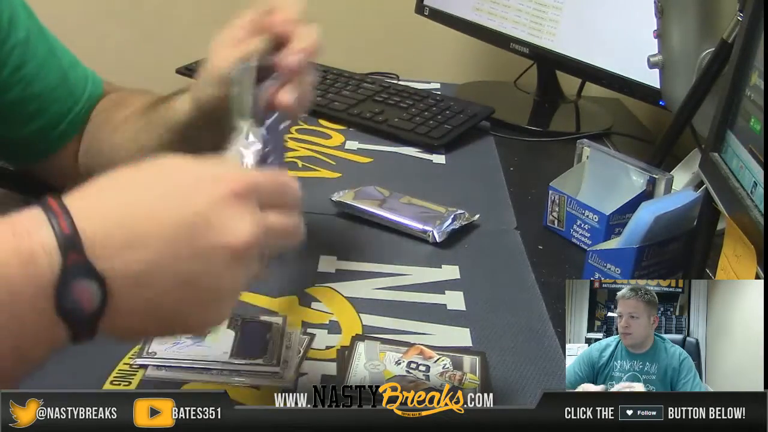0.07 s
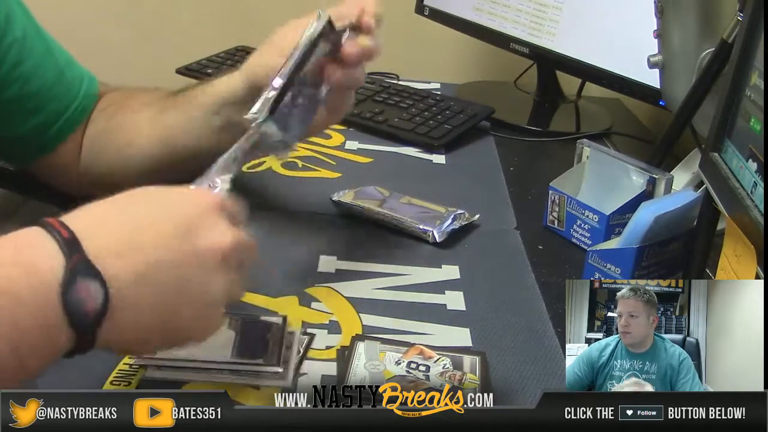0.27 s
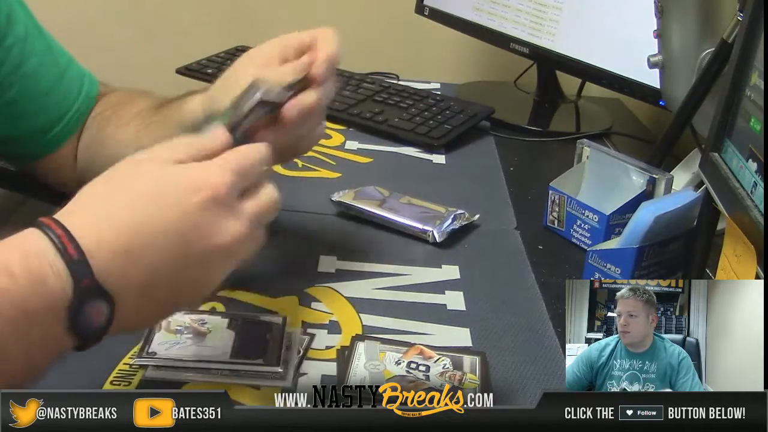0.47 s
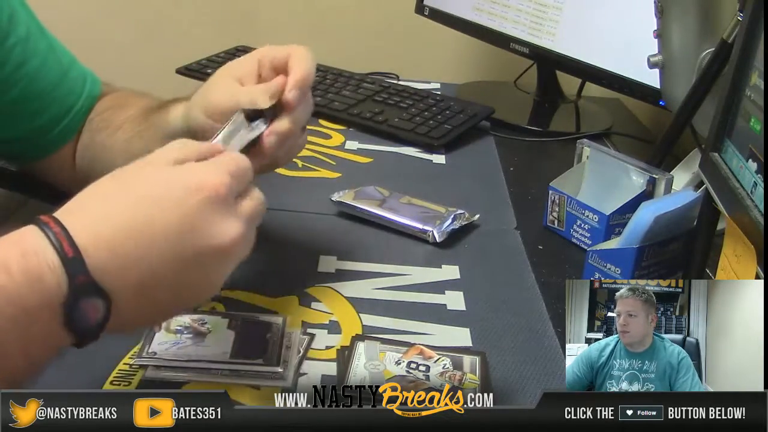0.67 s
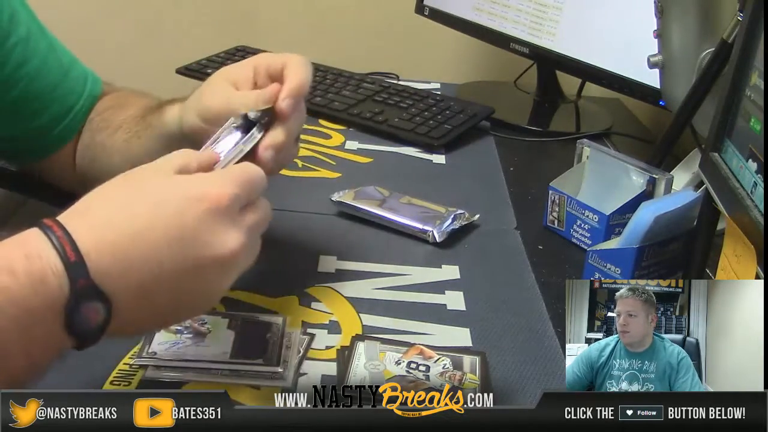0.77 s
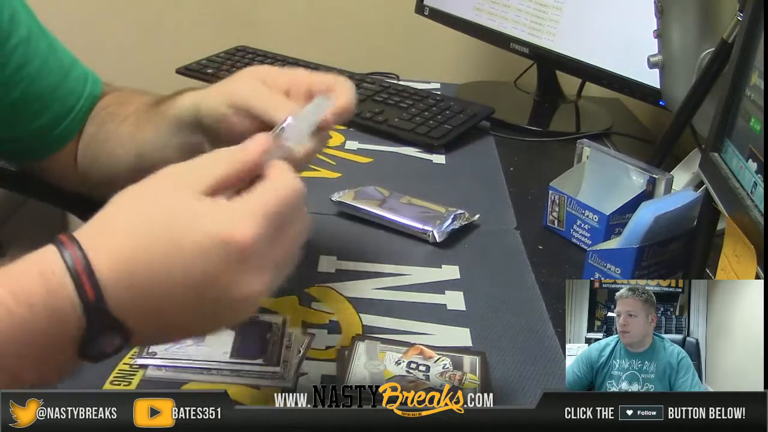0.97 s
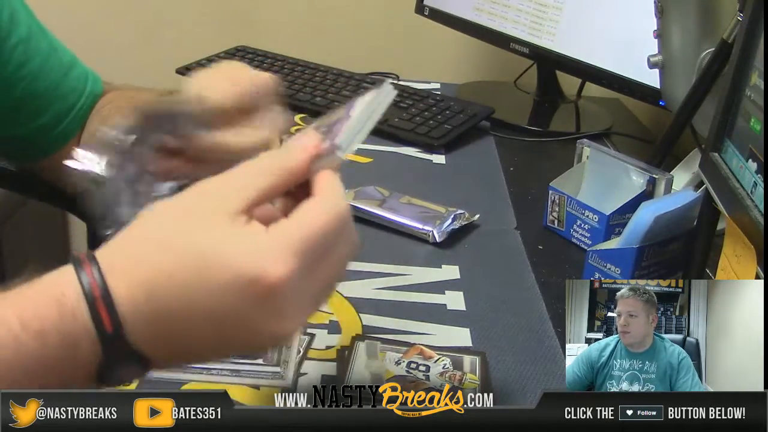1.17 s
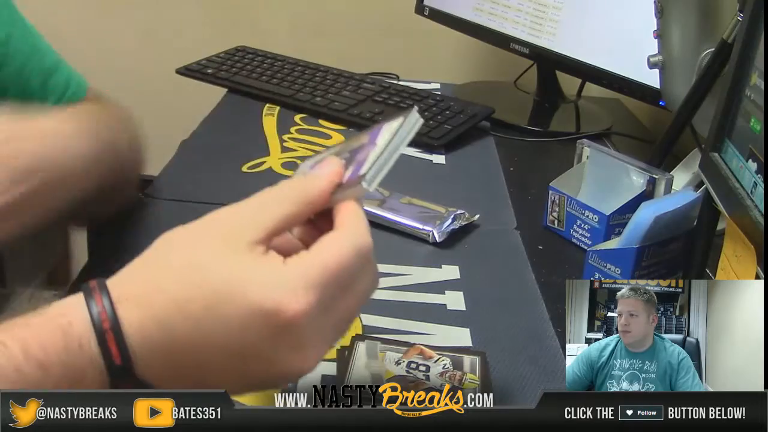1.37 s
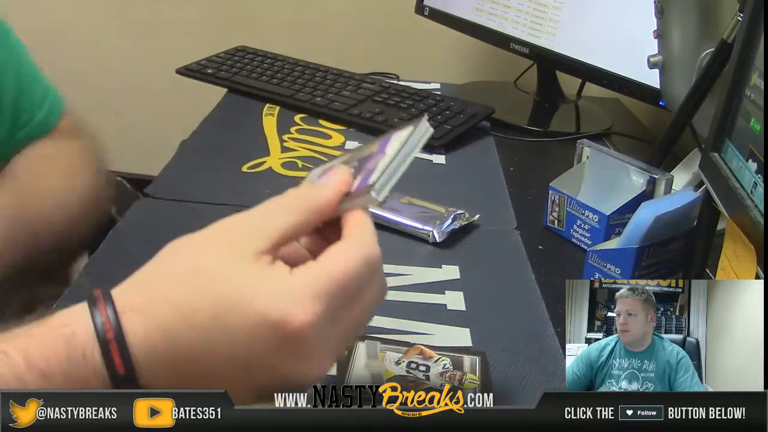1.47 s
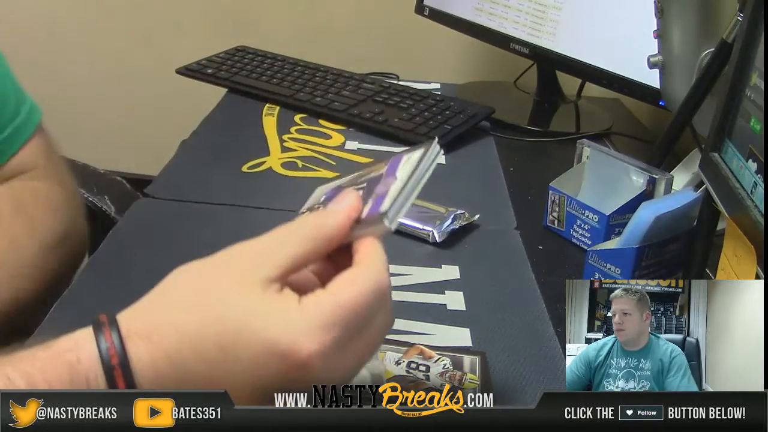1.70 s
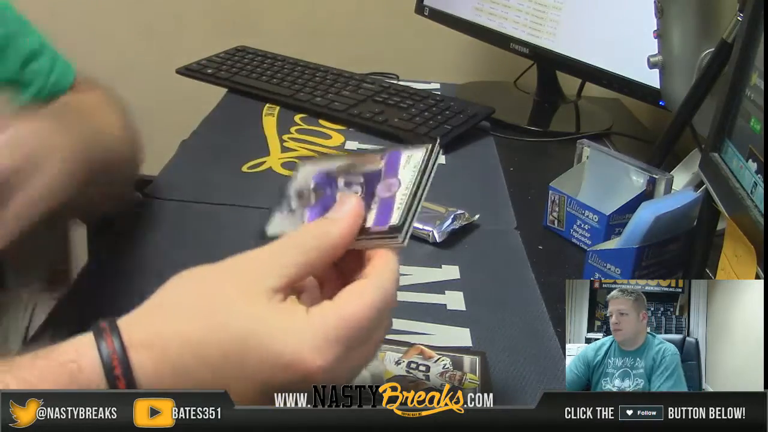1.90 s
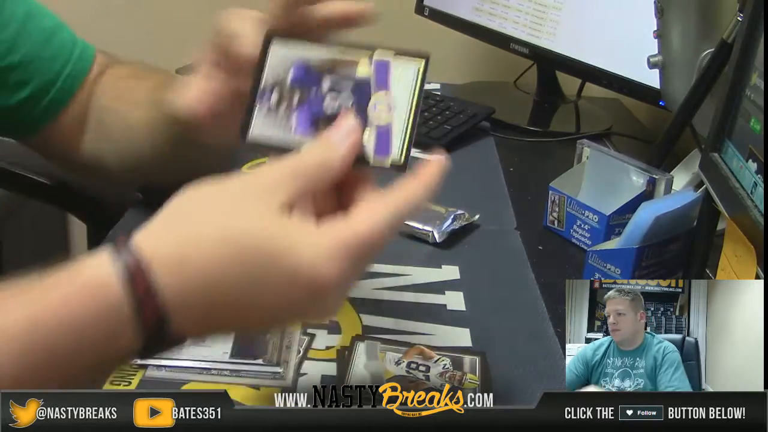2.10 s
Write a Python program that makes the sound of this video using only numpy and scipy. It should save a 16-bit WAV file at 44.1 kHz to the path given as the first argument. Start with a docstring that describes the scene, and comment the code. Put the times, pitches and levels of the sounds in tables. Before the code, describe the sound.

Cards and their plastic wrapping crackle and rub in someone's hands, loudest at first, with a second flurry midway and sparse ticks afterwards. The close microphone also catches faint desk rumbles and a low hum in a small room.

```python
"""Trading cards at a desk

A small room, one microphone close to the hands. Cards in plastic sleeves and stiff holders are handled
over a desk: edges catch and snap, faces slide with a fine stick-slip grain, the stack knocks softly.
Moving arms shake the desk. Behind it all, two close low hums beat over the rumble of the room."""
import sys
import numpy as np
from scipy import signal
from scipy.fft import rfft, irfft, next_fast_len
from scipy.io import wavfile

SR = 44100
rng = np.random.default_rng(int(sys.argv[2]) if len(sys.argv) > 2 else 0)


def wav_out(sig):
    """Save sig, one row per channel (or a flat mono array), as 16-bit PCM at SR to the path in sys.argv[1]."""
    wavfile.write(sys.argv[1], SR, np.round(np.clip(np.atleast_2d(sig).T, -1, 1) * 32767).astype(np.int16))


N = 94506

# an edge or a crease snaps: t/s, level/dB, ring f/Hz, ring lift/dB, body/dB, treble/dB
EDGE_SNAPS = [(0.0022, -12.5, 5230, 13, -7.5, -10), (0.0051, -20, 8100, 11, -7, -6),
              (0.013, -22, 7900, 25, -18, -14), (0.031, -19, 3470, 19, -6, 2.5),
              (0.0344, -20.5, 3600, 6, -43, -10), (0.049, -27.5, 5600, 23, -4, -2),
              (0.0576, -38, 7850, 6, -16, 0), (0.0672, -23.5, 7160, 9, -2.5, -5),
              (0.074, -21.5, 5500, 16, -11, -3), (0.0762, -26, 7400, 9, -4, -9),
              (0.0861, -24, 7800, 4, -11.5, -7), (0.0892, -26, 8500, 15, -16, -4),
              (0.0958, -28, 4300, 3, -3, -4), (0.101, -21, 8300, 10, -18, -1),
              (0.1082, -20.5, 3730, 15.5, -9, -8), (0.1162, -26.5, 7000, 12, -1.5, 0),
              (0.121, -27, 6000, 17, -5, -2), (0.129, -21.5, 3730, 1, -7.5, -8.5),
              (0.142, -33.5, 5400, 13, -8, -21), (0.1969, -31.5, 4000, 6.5, -1, -5),
              (0.2124, -37, 5070, 15, -5, -3), (0.2375, -34.5, 6260, 7, -17, -6),
              (0.248, -29, 6200, 12, -20, -12), (0.273, -37, 6870, 14, -15, 1),
              (0.2996, -36, 7700, 21, -14, -9), (0.3057, -30.5, 5300, 7, -15.5, -11),
              (0.334, -38, 3000, -1, -1, -14), (0.3506, -36.5, 4640, 17, -28, -2),
              (0.3622, -28.5, 5150, 1, -10, -12.5), (0.3713, -25, 4500, 10.5, -20, -4.5),
              (0.424, -36, 8040, 12, -22, -11), (0.4314, -30.5, 4400, 15.5, -19, -2),
              (0.4454, -31.5, 7100, 6, -9, -4), (0.458, -27.5, 2730, 5.5, -4, -6),
              (0.4898, -39, 7000, 11, -24, -11), (0.5275, -36, 5660, 14.5, -4, -2.5),
              (0.638, -39.5, 5400, 12.5, 2, -12), (0.6802, -38.5, 5540, 9, -3, -12),
              (0.8183, -42.5, 8150, 4, -19, -12), (0.8214, -38.5, 3300, 15, -6, -12),
              (0.8336, -38, 7800, 9, -5, -8), (0.863, -33.5, 4220, 21, -12, -13),
              (0.8636, -28, 5620, 19, -5, 0.5), (0.9316, -37.5, 7600, 17, -11, -2),
              (0.9597, -36.5, 2650, 8, -11, -6), (0.966, -40.5, 4500, 4, -1, -16),
              (0.9867, -34.5, 8500, 8, -7.5, -11), (0.9919, -31, 3380, 9.5, -26, -11),
              (1.0228, -31, 6200, 14, -24, -13), (1.0346, -31, 4560, 7, -1, -5),
              (1.038, -36, 4560, 8, -8, 0), (1.056, -32.5, 4400, 10, -2, -19),
              (1.0662, -27.5, 8450, 14, -13, -5), (1.089, -29, 8000, 10, -27, -18),
              (1.091, -27, 6540, -4, -11, -1), (1.1, -31, 8100, 4, -8, 4),
              (1.1211, -29.5, 2340, 13, -6, -27), (1.1473, -33, 4230, 16, -24, -10),
              (1.1572, -27, 3630, 9.5, -10, -20), (1.1664, -29, 6160, 6, -3.5, -7),
              (1.18, -28, 3700, 2, -9, -10), (1.2025, -34.5, 6950, 14, -14, 3),
              (1.2241, -35, 3470, 5, -1, -6.5), (1.282, -41.5, 3470, 13, -1, -13),
              (1.3096, -37.5, 1370, 15, -3.5, -8), (1.402, -32.5, 7420, 6, -20, -9.5),
              (1.4422, -37, 4700, 8, -1, -16), (1.5164, -31.5, 2400, 13, -6, -6.5),
              (1.5289, -38, 6640, 13, 2.5, -12), (1.582, -39.5, 6200, 6, -6, -11),
              (1.594, -37.5, 5000, 5.5, -10, -12), (1.6688, -37, 8300, 12, -1, -7),
              (1.712, -31.5, 3920, 6.5, -3, -24), (1.772, -38.5, 7260, 11.0, -1.5, -3),
              (1.784, -44, 6000, 3, -4, -8.5), (1.9798, -43.5, 2640, 30, -7, -27),
              (2.0115, -41, 3020, 20, 3.5, -27.5)]
# spectrum of a plain snap: f/Hz, level/dB
SNAP_SPECTRUM = [(100, -2.5), (400, -10), (1000, -7.5), (2200, 1.5), (4000, 1), (8000, 0), (10000, -4.5),
                 (16000, -7.5)]
# plastic slides on plastic: t/s, length/s, level/dB, body lift/dB, treble lift/dB
PLASTIC_SLIDES = [(-0.01, 0.034, -27.5, 2, -1.5), (0.034, 0.069, -33.5, -4.5, -1.5),
                  (0.175, 0.095, -44, 0.5, -2.5), (0.285, 0.052, -46, -3.5, -2), (0.353, 0.028, -42, -1, 3),
                  (0.421, 0.033, -41.5, 0, 2), (0.446, 0.012, -38, 1, -1), (0.484, 0.029, -57, -11, 3),
                  (0.631, 0.19, -55, 3.5, -6), (0.811, 0.075, -49, 3, -2), (0.951, 0.03, -48.5, -3, -1),
                  (0.984, 0.036, -44, -0.5, -6), (1.018, 0.09, -39.5, -1.5, -5),
                  (1.108, 0.074, -38.5, 3.5, -4.5), (1.187, 0.019, -41.5, -5, -1),
                  (1.291, 0.026, -50.5, 6, 0), (1.32, 0.1, -52.5, -18, -6.5), (1.39, 0.07, -45, 1, -3.5),
                  (1.512, 0.027, -46.5, 10, -3.5), (1.584, 0.02, -53, 8, 1), (1.674, 0.061, -42, 4.5, -9),
                  (1.77, 0.037, -47, 6, -5.5), (2.018, 0.066, -67, 3, 1), (2.123, 0.028, -55, 7, -9)]
# spectrum of sliding plastic: f/Hz, level/dB
SLIDE_SPECTRUM = [(100, -20), (300, -10), (700, -5.5), (1150, -5), (2000, -0.5), (2900, -3), (3650, -1),
                  (4200, -1), (6000, -2.5), (8200, -1.5), (9800, -6), (13000, -3.5), (16000, -8.5)]
# card scuffs against sleeve: t/s, length/s, level/dB, ring f/Hz
CARD_SCUFFS = [(0.068, 0.051, -38, 790), (1.046, 0.0085, -35.5, 1200), (1.301, 0.014, -46.5, 1480),
               (1.496, 0.0079, -54, 5200), (1.678, 0.022, -42.5, 2780), (1.69, 0.019, -44, 1620),
               (1.77, 0.04, -55.5, 1750), (1.972, 0.0065, -51, 2650), (2.005, 0.026, -49.5, 3460),
               (1.983, 0.033, -54.5, 1600)]
# spectrum of a scuff: f/Hz, level/dB
SCUFF_SPECTRUM = [(100, -38), (500, 1), (1500, 3.5), (4000, 6), (8000, 0.5), (16000, -4)]
# the stack knocks in the hands: t/s, level/dB, ring f/Hz, ring Q
STACK_KNOCKS = [(0.003, -29.5, 460, 2.1), (0.103, -45, 750, 2.8), (0.196, -47, 450, 1.5),
                (0.4575, -35, 301, 2.8), (0.735, -45.5, 400, 1.8), (0.81, -45.5, 414, 2.7),
                (0.966, -40.5, 425, 2.8), (1.056, -37.5, 420, 3.8), (1.098, -38, 400, 1.8),
                (1.164, -38.5, 400, 2.5), (1.1798, -29, 530, 1.4), (1.246, -45, 400, 1.3),
                (1.517, -42, 710, 2.4), (1.668, -41.5, 510, 2)]
# spectrum of a knock: f/Hz, level/dB
KNOCK_SPECTRUM = [(60, -8.5), (200, -5), (350, -1.5), (520, -1), (760, -5.5), (1300, -1.5), (3000, -31),
                  (16000, -68.5)]
# arms shake the desk: t/s, length/s, level/dB, lift of the desk top's ring/dB
ARM_BUMPS = [(-0.02, 0.091, -38.5, 14.5), (0.114, 0.21, -44, -15), (1.281, 0.074, -41, 16.5)]
# spectrum of the shaken desk: f/Hz, level/dB
DESK_SPECTRUM = [(15, -11), (27, -15), (36, 4), (50, -18), (90, -20.5), (155, -25.5), (230, -36),
                 (600, -64.5), (16000, -91)]
# steady hums in the room, the first two beating: f/Hz, level/dB
HUM_TONES = [(117.1, -46.5), (119.97, -50), (186.3, -57), (791, -76.5)]
# spectrum of the room tone: f/Hz, level/dB
ROOM_TONE_SPECTRUM = [(15, 2.5), (35, -1), (60, -7), (88, -13), (150, -5), (185, -9), (230, -11.5),
                      (320, -19), (500, -25.5), (900, -28), (1600, -34), (4000, -44.5), (8000, -49.5),
                      (16000, -61)]

BODY_HZ, TREBLE_HZ = 1770, 9030   # body lies below, treble above
PLAIN_BODY_DB, PLAIN_TREBLE_DB = -9.5, -9   # a snap with these table values keeps the plain colour
SNAP_REF_S, KNOCK_REF_S = 0.003, 0.0027   # a hit's level is its energy spread over this time
SLEEVE_OFF_S = 1.25   # once the loose sleeve is pulled away, the cards glide with little crinkle


def snaps():
    """Close up, each snap is a sharp crack, ringing at the pitch of the bent plastic."""
    crack_s, scatter_s, scatter_db = 0.00046, 0.0026, -5.5   # the scatter comes off hands and desk
    release_kick, trim_db = 2, 0.5
    out, t = np.zeros(N), np.arange(SR // 20) / SR
    envelope = np.exp(-t / crack_s) + from_db(scatter_db) * np.exp(-t / scatter_s)
    for start, db, hz, ring_db, body_db, treble_db in EDGE_SNAPS:
        crack = envelope * rng.standard_normal(len(t))
        crack[0] = release_kick
        crack = ringing(coloured(crack, SNAP_SPECTRUM), hz, q=9.6, lift_db=ring_db)
        crack = shelved(crack, body_db - PLAIN_BODY_DB, treble_db - PLAIN_TREBLE_DB)
        add(out, start, from_db(db + trim_db) * unit_hit(crack, SNAP_REF_S))
    return out


def slides():
    """Sleeves and holders rub together in bright, grainy strokes, with crinkle riding on them."""
    crinkle_db = np.where(np.arange(N) / SR < SLEEVE_OFF_S, -3.5, -11.5)
    rub = friction() + from_db(crinkle_db) * crinkle()
    rub = rms_one(coloured(rub, SLIDE_SPECTRUM))
    out = np.zeros(N)
    for start, length, db, body_db, treble_db in PLASTIC_SLIDES:
        envelope = stroke(start, length, attack_s=0.012, release_s=0.017)
        out += from_db(db) * envelope * shelved(rub, body_db, treble_db)
    return out


def friction():
    """Faces stick and slip: tiny grains of uneven size over a smooth hiss."""
    grains_per_s, spread_db, hiss_share = 2500, 3, 0.54
    sizes = from_db(spread_db * np.minimum(rng.exponential(1, N), 4))
    signs = rng.choice([-1, 1], N)
    grains = sizes * signs * (rng.random(N) < grains_per_s / SR)
    return np.sqrt(1 - hiss_share) * rms_one(grains) + np.sqrt(hiss_share) * rng.standard_normal(N)


def crinkle():
    """The sleeves give small random ticks, each at a pitch of its own."""
    ticks_per_s, spread_db, decay_s = 380, 4.5, 0.00036
    out, t = np.zeros(N), np.arange(SR // 200) / SR
    for when, size, pitch in rng.random((int(ticks_per_s * N / SR), 3)):
        burst = np.exp(-t / decay_s) * rng.standard_normal(len(t))
        tick = ringing(burst, hz=2200 * 4 ** pitch, q=9.9, lift_db=9.5)
        db = spread_db * min(-np.log(1 - size), 3.5)   # many faint ticks, a few loud ones
        add(out, when * N / SR, from_db(db) * rms_one(tick))
    return rms_one(out)


def scuffs():
    """Card rubs on sleeve in short, duller strokes, each bringing out one resonance."""
    rub = coloured(friction(), SCUFF_SPECTRUM)
    out = np.zeros(N)
    for start, length, db, hz in CARD_SCUFFS:
        envelope = stroke(start, length, attack_s=0.0076, release_s=0.017)
        out += from_db(db) * envelope * rms_one(ringing(rub, hz, q=6.2, lift_db=17))
    return out


def knocks():
    """The stack knocks: one push and a brief rattle; the grip sets the pitch and width of the ring."""
    push, rattle_s = 15.7, 0.013
    out, t = np.zeros(N), np.arange(SR // 10) / SR
    for start, db, hz, q in STACK_KNOCKS:
        force = np.exp(-t / rattle_s) * rng.standard_normal(len(t))
        force[0] = push
        thud = ringing(coloured(force, KNOCK_SPECTRUM), hz, q, lift_db=19)
        add(out, start, from_db(db) * unit_hit(thud, KNOCK_REF_S))
    return out


def desk():
    """Under the hands, the desk rumbles as the arms move, with a low ring of its top."""
    rumble = rms_one(coloured(rng.standard_normal(N), DESK_SPECTRUM))
    out = np.zeros(N)
    for start, length, db, ring_db in ARM_BUMPS:
        envelope = stroke(start, length, attack_s=0.011, release_s=0.063)
        out += from_db(db) * envelope * ringing(rumble, hz=151, q=3.5, lift_db=ring_db)
    return out


def room_tail(x):
    """The small room returns a short diffuse tail to the microphone, darkening as it dies."""
    split_hz, low_t60_s, treble_t60_s = 5000, 0.42, 0.33
    delay_s, tail_db = 0.0068, -12
    t = np.arange(SR // 2) / SR
    noise = rng.standard_normal(len(t))
    low = signal.sosfiltfilt(signal.butter(2, split_hz, fs=SR, output="sos"), noise)
    treble = noise - low
    tail = low * from_db(-60 * t / low_t60_s) + treble * from_db(-60 * t / treble_t60_s)
    tail *= t > delay_s
    return from_db(tail_db) * signal.fftconvolve(x, tail / np.sqrt(np.sum(tail ** 2)))[:N]


def hum():
    """Steady tones in the background; the lowest two lie close in pitch and beat."""
    crest_s = 0.465   # a moment when the two swell together
    t = np.arange(N) / SR - crest_s
    return sum(np.sqrt(2) * from_db(db) * np.cos(2 * np.pi * hz * t) for hz, db in HUM_TONES)


def room_tone():
    """The dull, steady noise of the room around the microphone."""
    return from_db(-46) * rms_one(coloured(rng.standard_normal(N), ROOM_TONE_SPECTRUM))


def from_db(db):
    """Decibels to gain."""
    return 10 ** (np.asarray(db) / 20)


def rms_one(x):
    """Scale to rms 1."""
    return x / np.sqrt(np.mean(x ** 2) + 1e-20)


def unit_hit(x, span_s):
    """Scale a hit so that its energy, spread over span_s, has rms 1."""
    return x * np.sqrt(span_s * SR / np.sum(x ** 2))


def add(out, start_s, x):
    """Mix a short sound in at a time."""
    i = max(int(start_s * SR), 0)
    out[i:i + len(x)] += x[:max(N - i, 0)]


def coloured(x, spectrum):
    """Causal (minimum-phase) filter that follows points of f/Hz, level/dB."""
    size = 2 * next_fast_len(len(x))
    hz, db = np.transpose(spectrum)
    grid_hz = np.maximum(np.arange(size // 2 + 1) * SR / size, 1)
    gain = from_db(np.interp(np.log(grid_hz), np.log(hz), db))
    cepstrum = irfft(np.log(gain))
    cepstrum[1:size // 2] *= 2   # fold onto positive time: nothing sounds ahead of a hit
    cepstrum[size // 2 + 1:] = 0
    return irfft(rfft(x, size) * np.exp(rfft(cepstrum)))[:len(x)]


def shelved(x, body_db, treble_db):
    """Lift or lower the body and the treble, each across half an octave."""
    step = 2 ** 0.25
    return coloured(x, [(BODY_HZ / step, body_db), (BODY_HZ * step, 0),
                        (TREBLE_HZ / step, 0), (TREBLE_HZ * step, treble_db)])


def ringing(x, hz, q, lift_db):
    """Lift or lower one resonance in a sound."""
    resonance = signal.lfilter(*signal.iirpeak(hz, q, fs=SR), x)
    return x + (from_db(lift_db) - 1) * resonance


def stroke(start_s, length_s, attack_s, release_s):
    """Envelope of one movement: rise, hold, exponential release."""
    t = np.arange(N) / SR - start_s
    return np.clip(t / attack_s, 0, 1) * np.exp(-np.maximum(t - length_s, 0) / release_s)


def scene():
    """At the microphone, in mono: cards in front, the desk below, hum and room tone behind."""
    cards = snaps() + slides() + scuffs() + knocks()
    return (cards + room_tail(cards) + desk() + hum() + room_tone())[None]


def record(dry):
    """The microphone chain cuts the very top steeply."""
    cutoff_hz = 15800
    return signal.sosfilt(signal.ellip(10, 0.1, 80, cutoff_hz, fs=SR, output="sos"), dry)


dry = scene()
out = record(dry)
wav_out(out)
```